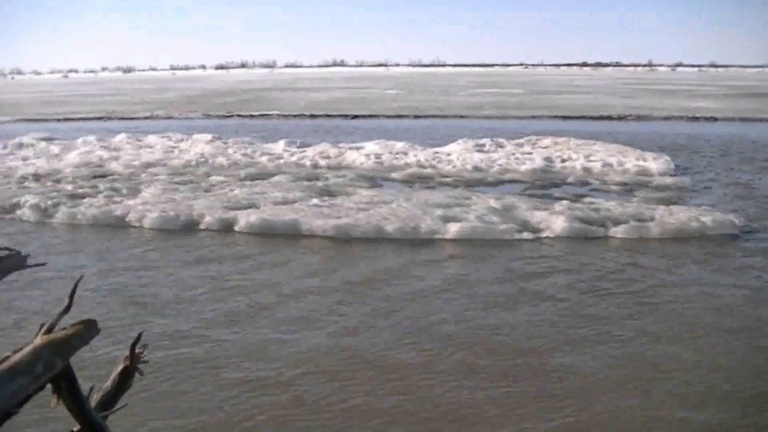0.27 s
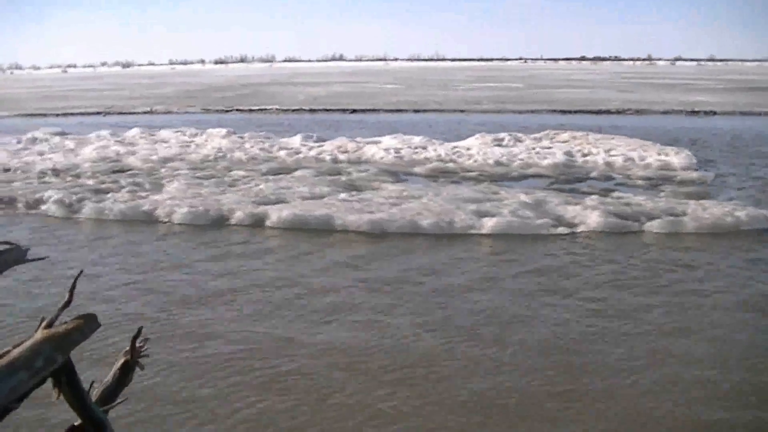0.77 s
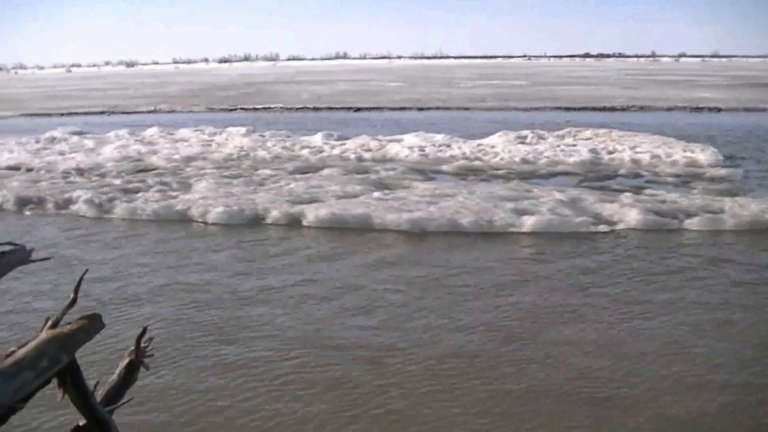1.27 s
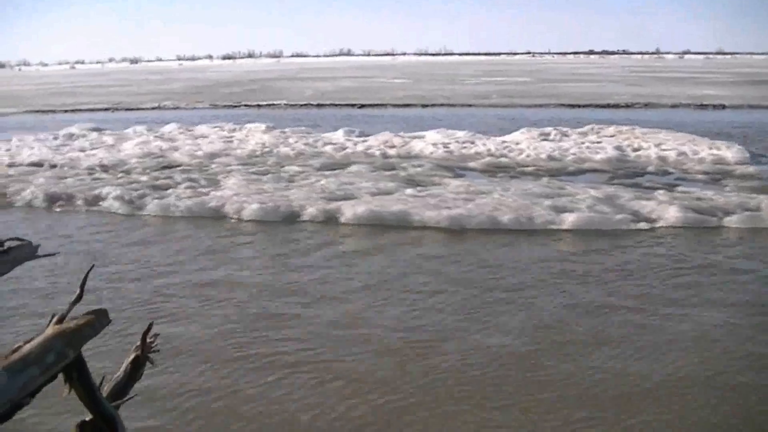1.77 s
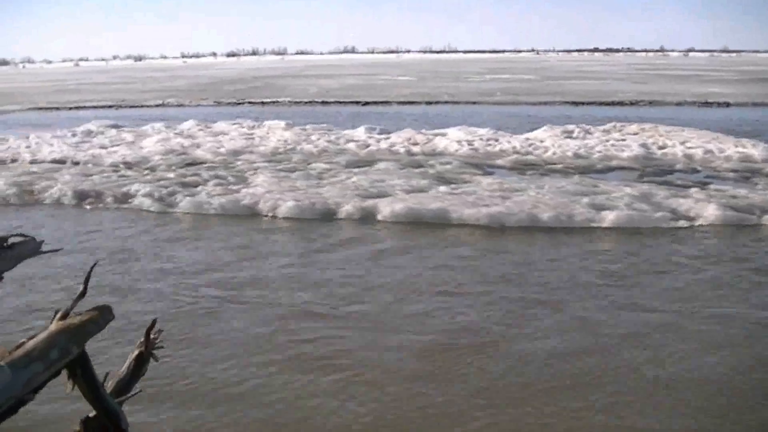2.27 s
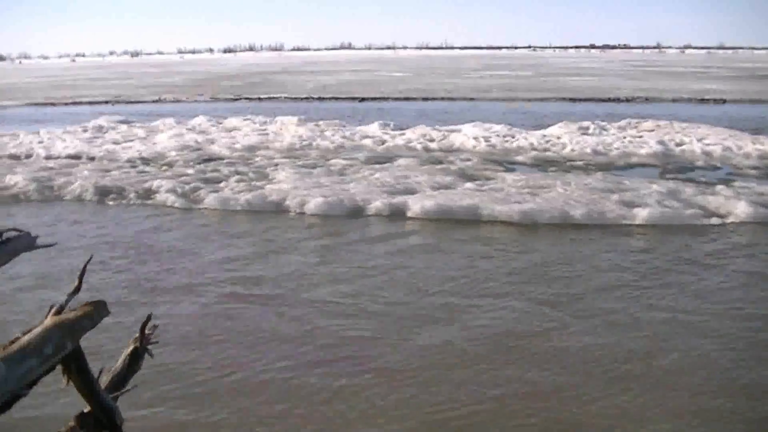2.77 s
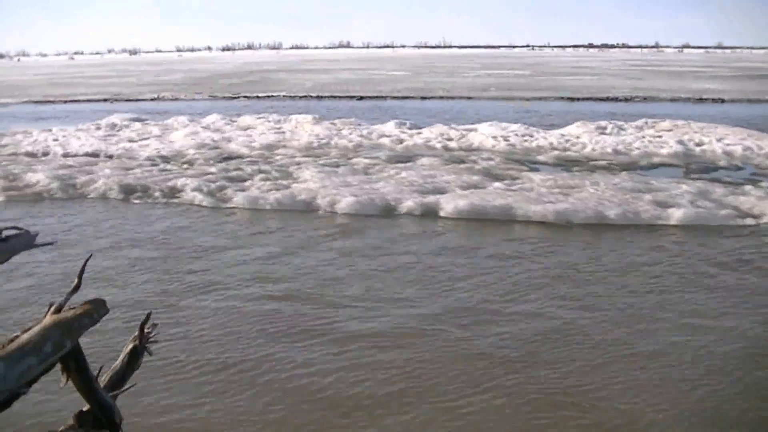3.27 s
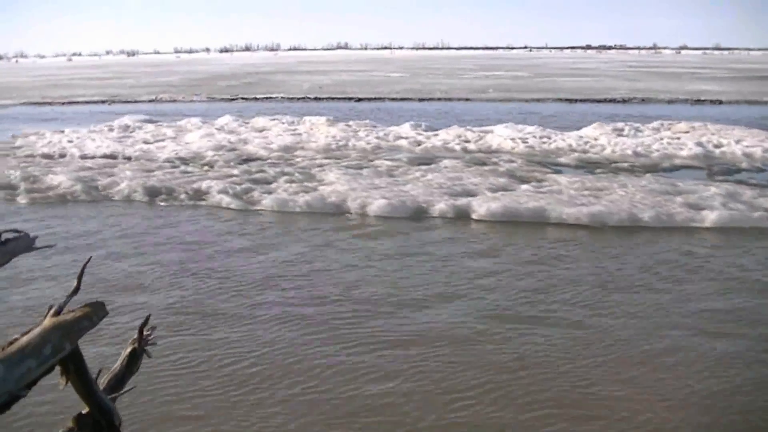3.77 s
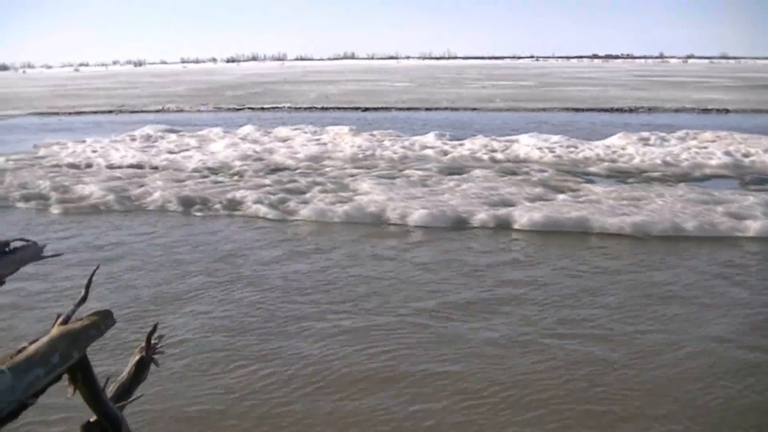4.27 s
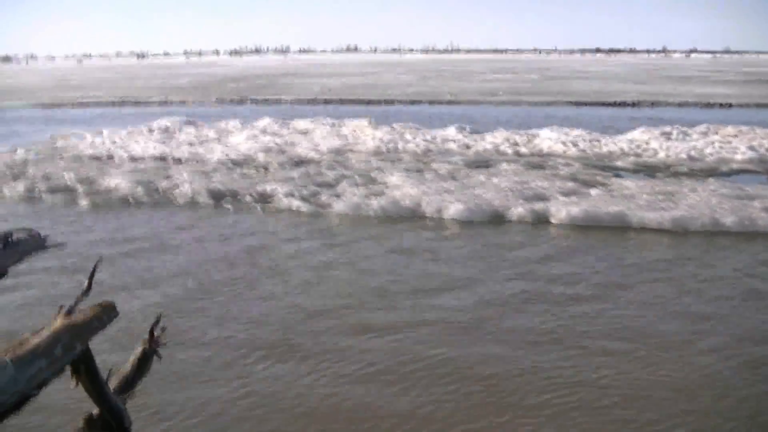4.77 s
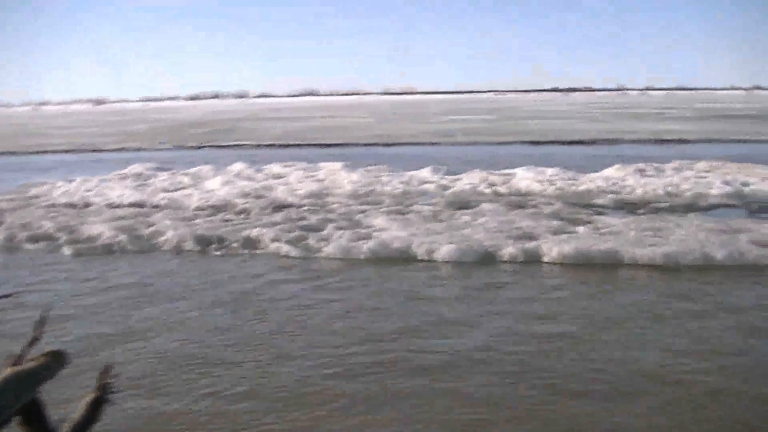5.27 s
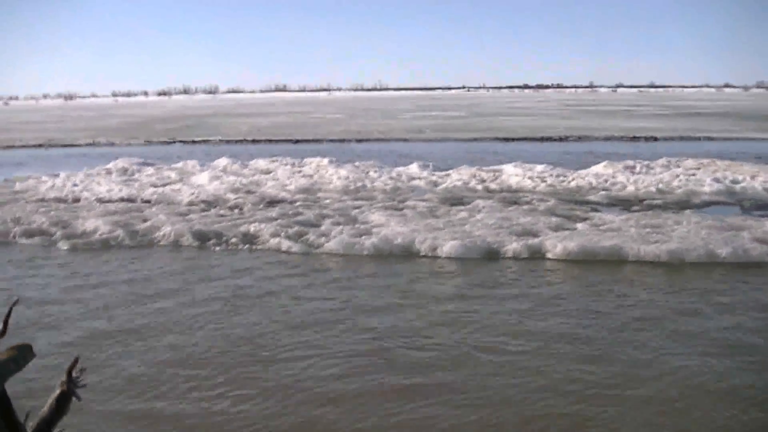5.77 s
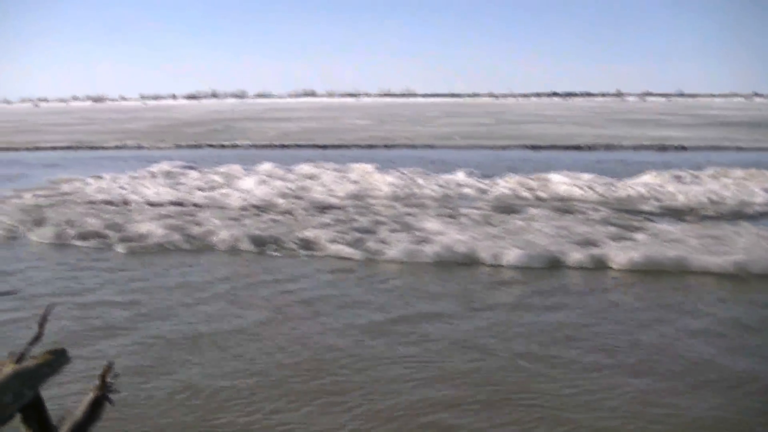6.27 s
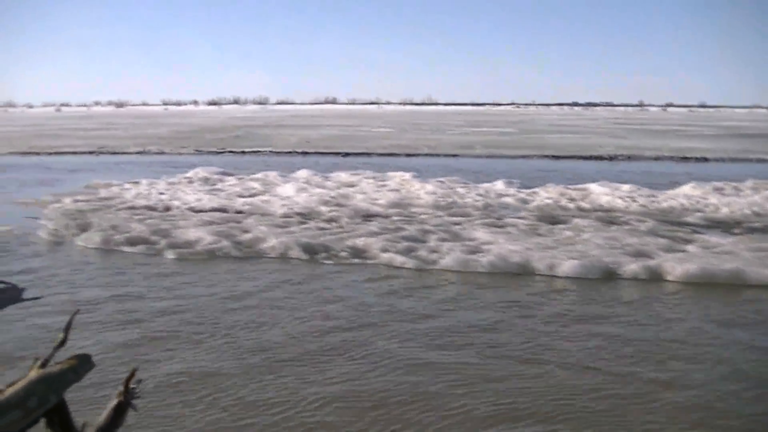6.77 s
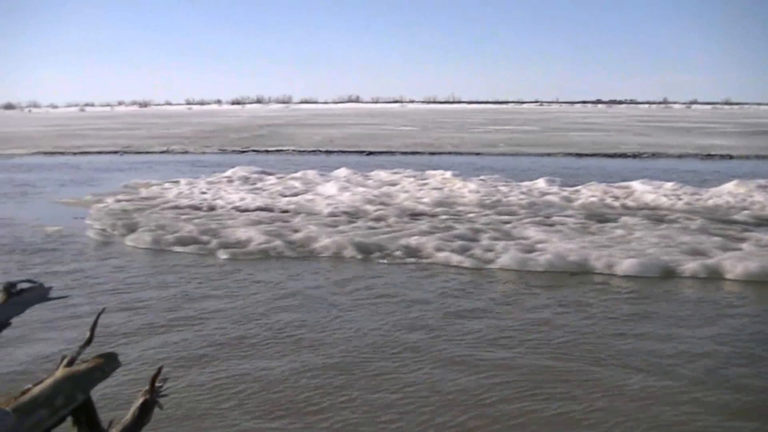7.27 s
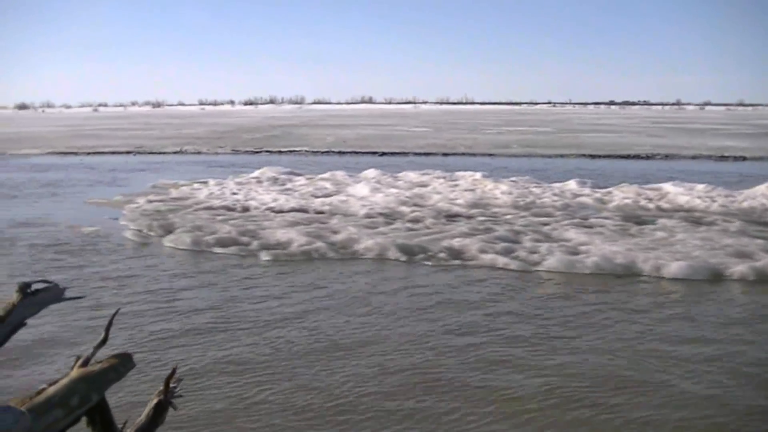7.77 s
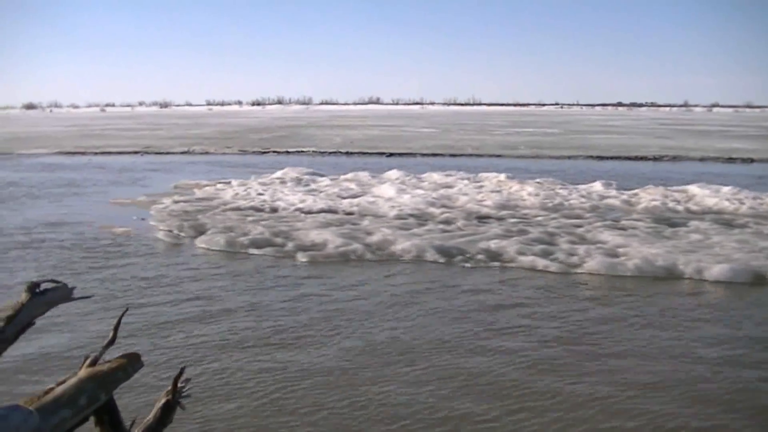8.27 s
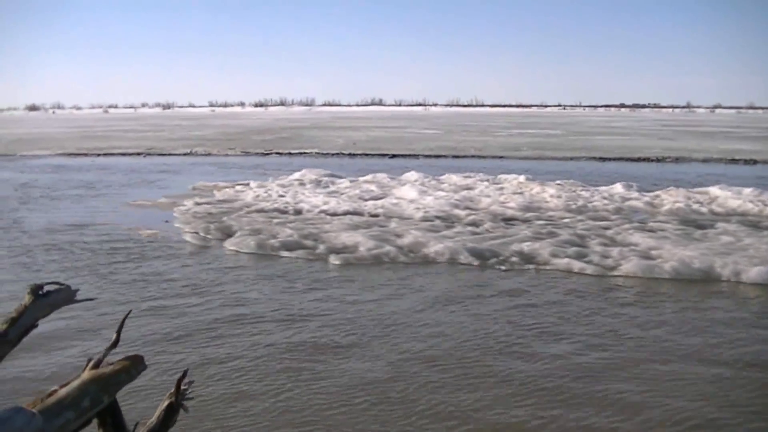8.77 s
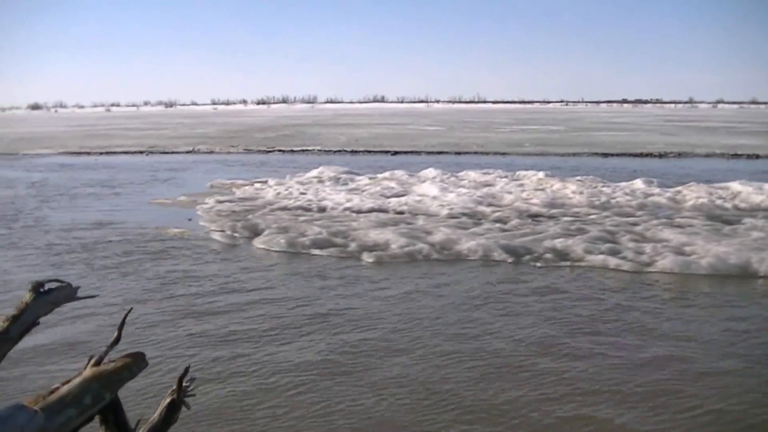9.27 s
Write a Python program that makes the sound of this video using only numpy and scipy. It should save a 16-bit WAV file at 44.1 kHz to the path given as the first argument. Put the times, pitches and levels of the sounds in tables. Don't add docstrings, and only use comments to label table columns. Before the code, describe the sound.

Slushy ice drifts along a river, crackling and ticking irregularly with small wet plops and gurgles, while wind buffets the right side.

```python
import sys
import numpy as np
from scipy import signal
from scipy.fft import rfft, irfft
from scipy.io import wavfile
from scipy.ndimage import uniform_filter1d

SR = 44100
rng = np.random.default_rng(int(sys.argv[2]) if len(sys.argv) > 2 else 0)


def to_linear_factor(level_db):
    exponent = np.asarray(level_db, float) / 20
    return 10 ** exponent


def generate_wav(sig):
    pcm = np.round(np.clip(np.atleast_2d(sig).T, -1, 1) * 32767).astype(np.int16)
    wavfile.write(sys.argv[1], SR, pcm)


N = 420273

# (time [s], peak [dB], pitch [Hz], ring time T60 [s])
HOLLOWS = [(0.17, -41.5, 750, 0.026), (2.3142, -40, 1220, 0.025), (2.4746, -22.5, 804, 0.03),
           (2.4867, -29.5, 730, 0.011), (2.5623, -32, 950, 0.003), (2.57, -38.5, 870, 0.013),
           (2.864, -38.5, 710, 0.014), (2.882, -36, 750, 0.015), (2.9374, -37.5, 660, 0.058),
           (3.012, -25, 827, 0.0074), (3.046, -33, 1110, 0.015), (3.5796, -29.5, 785, 0.016),
           (4.117, -30, 1020, 0.0015), (4.2347, -28, 696, 0.0018), (4.369, -36.5, 1100, 0.004),
           (5.3924, -37.5, 870, 0.022), (6.2374, -33.5, 956, 0.015), (7.7331, -34, 900, 0.014),
           (7.7506, -28, 813, 0.0095), (7.771, -30, 897, 0.032), (7.7751, -29, 780, 0.01),
           (8.2773, -32, 950, 0.027), (8.5687, -38.5, 783, 0.013), (9.416, -38.5, 780, 0.0089)]
# (time [s], peak [dB], pitch [Hz], ring time T60 [s])
POCKETS = [(0.1688, -38, 1860, 0.0071), (0.2108, -30, 1940, 0.0033), (0.4665, -29.5, 1693, 0.022),
           (0.636, -33, 1660, 0.0044), (1.9726, -35, 1850, 0.0076), (2.047, -39, 1800, 0.008),
           (2.124, -36, 1430, 0.027), (2.347, -32.5, 1750, 0.0025), (2.488, -31.5, 1500, 0.013),
           (2.9905, -31, 1700, 0.02), (3.013, -23, 1470, 0.0091), (3.576, -34.5, 1460, 0.0071),
           (4.102, -27.5, 2680, 0.0042), (4.159, -35, 1560, 0.0067), (4.2124, -34.5, 1840, 0.014),
           (4.616, -32.5, 1480, 0.031), (4.6248, -29.5, 2007, 0.012), (4.7078, -35, 1360, 0.0061),
           (5.1446, -28, 1880, 0.002), (5.2043, -29, 1680, 0.017), (6.021, -36, 1800, 0.012),
           (6.2352, -30.5, 1460, 0.011), (7.0225, -35.5, 1470, 0.0067), (7.1447, -36, 1670, 0.0056),
           (7.2977, -33.5, 2130, 0.024), (7.305, -35, 2240, 0.012), (7.5965, -32.5, 1540, 0.013),
           (7.7437, -34.5, 2280, 0.022), (7.773, -39, 2250, 0.015), (8.283, -29, 1487, 0.027),
           (8.339, -33.5, 1930, 0.021), (9.02, -48.5, 1680, 0.042), (9.09, -48, 2760, 0.051)]
# (time [s], peak [dB], pitch [Hz])
GULPS = [(0.0457, -42, 1050), (1.5966, -39, 720), (1.8041, -44, 626), (2.0308, -42.5, 673),
         (2.0572, -40, 640), (2.3333, -35.5, 810), (2.4862, -30.5, 960), (2.8022, -41.5, 780),
         (4.2886, -39.5, 830), (3.482, -42.5, 775), (5.0028, -38, 1130), (5.3393, -43, 654),
         (6.2515, -40, 635), (6.2774, -41.5, 714), (6.7055, -41.5, 660), (7.218, -46.5, 870),
         (7.275, -44.5, 720), (8.4088, -40, 730)]
# (time
# [s], peak [dB], resonance [Hz])
ICE_TICKS = [(.089, -33, 1740), (0.1767, -30.5, 1650), (1.083, -29.5, 1690), (1.3912, -23, 1550),
             (2.1382, -29, 1760), (2.435, -24, 1090), (2.475, -24.5, 1050), (2.5248, -31, 1560),
             (2.864, -28, 1310), (3.3505, -30.5, 1500), (3.3686, -33, 1170), (3.6811, -34, 1720),
             (4.419, -30.5, 1490), (5.29, -33.5, 1410), (5.297, -33.5, 1670), (5.688, -32, 1660),
             (5.744, -28.5, 1440), (5.798, -29, 1690), (6.0072, -32.5, 1450), (6.3664, -36.5, 1630),
             (8.2772, -21.5, 1770), (8.8809, -34, 1090), (8.911, -25, 1620), (9.0798, -37, 1530),
             (0.115, -31.5, 1740), (0.344, -31, 2950), (1.4941, -34, 1750), (1.727, -36, 1720),
         (1.853, -29.5, 1940), (1.9907, -34, 1870), (2.1695, -33.5, 3050), (3.0388, -22, 2290),
         (3.123, -26.5, 2230), (3.3607, -27.5, 1940), (3.551, -27, 2950), (3.599, -30.5, 2150),
         (4.368, -36, 1980), (4.625, -26, 1780), (5.1635, -28.5, 2340), (5.253, -29, 2500),
         (5.268, -32, 2610), (5.394, -38, 2400), (5.734, -40, 1780), (5.9381, -32.5, 2080),
         (6.6607, -38, 2100), (7.3389, -32, 2150), (7.975, -29, 1900), (8.2072, -34, 1930),
         (8.444, -33, 1930), (8.866, -32.5, 1230), (8.992, -36, 2260), (9.064, -37.5, 2330),
             (0.0767, -37, 2780), (0.199, -42, 1760), (0.2522, -38.5, 1760), (0.5293, -35, 1720),
             (0.758, -36.5, 1790), (0.7672, -38, 1680), (1.209, -38.5, 1640), (1.7945, -37, 1390),
             (1.891, -37.5, 1840), (1.9257, -36, 1540), (2.536, -38, 1580), (2.5727, -38, 1720),
             (2.6338, -38, 3200), (2.939, -35.5, 1410), (2.983, -33, 2030), (3.0587, -26.5, 3120),
             (3.4885, -35, 2540), (3.7032, -39, 1920), (4.0744, -33.5, 2120), (4.092, -31, 2050),
             (4.121, -36, 1860), (4.137, -33.0, 1560), (4.349, -39, 1550), (4.4436, -38, 1820),
             (4.5593, -34, 1530), (4.7687, -38, 1700), (4.8853, -38.5, 2080), (4.9534, -37, 1800),
             (4.985, -38.5, 2790), (5.003, -37.5, 1500), (5.218, -37, 2210), (5.2835, -32, 2530),
             (5.7527, -37, 1650), (6.0943, -36, 1650), (6.197, -35.5, 1500), (6.276, -44, 2660),
             (6.295, -41, 2070), (6.321, -39, 2500), (6.762, -35, 2410), (6.776, -35.5, 2070),
             (7.3208, -43, 2000), (7.353, -38, 1980), (7.8264, -37, 2180), (7.834, -35, 2080),
             (8.064, -35.5, 1590), (8.1023, -37, 1960), (8.1796, -37.5, 1480), (8.24, -33.5, 2150),
             (8.3237, -32, 2140), (8.6158, -38, 1900), (8.7982, -37, 2040),
             (0.363, -34.5, 6550), (0.632, -38, 6450), (0.8311, -30, 4930), (1.0568, -37.5, 4500),
           (1.061, -37, 7200), (2.27, -35.5, 4700), (2.4037, -31, 5950), (2.4492, -27, 4700),
           (3.098, -32, 5500), (3.597, -30.5, 4830), (3.681, -35.5, 4850), (4.189, -33, 4000),
           (5.265, -36, 4550), (5.659, -42, 4470), (5.733, -36, 4540), (5.974, -32.5, 4570),
           (6.035, -33.5, 4560), (6.276, -40, 4830), (6.948, -36.5, 4940), (7.016, -39, 8500),
           (7.9677, -36.5, 6150), (8.834, -39.5, 5400), (9.155, -34, 5030),
             (2.4225, -33, 1740), (2.444, -36, 2840), (2.452, -41, 1890), (2.808, -36, 1490),
          (2.9923, -33, 2960), (4.2322, -36, 4500), (4.4442, -38, 2850), (5.5171, -39, 1270),
          (5.8192, -35, 1610), (6.2656, -43, 3020), (7.2975, -35, 2980)]
# (time [s], peak [dB])
SHARDS = [(0.0896, -34), (0.2088, -35), (0.344, -27), (0.466, -33.5), (2.18, -38), (2.426, -32),
          (2.865, -30.5), (3.012, -29.5), (3.046, -27), (3.073, -32), (3.549, -36), (3.587, -36),
          (3.615, -31.5), (3.7978, -38), (4.254, -32), (4.098, -32), (4.795, -39), (5.1632, -38),
          (5.284, -34), (6.0215, -33), (6.3212, -39), (7.063, -39.5), (7.242, -38.5), (9.1414, -39.5),]
# (time [s], peak [dB])
GRIT = [(1.845, -39.5), (2.3265, -40), (3.061, -38), (3.0805, -43), (3.4407, -41), (4.2405, -44),
        (4.247, -38), (4.884, -39), (5.276, -34), (5.387, -38.5), (5.986, -46), (6.212, -40),
        (8.0153, -40.5), (8.5034, -41.5)]
# (time [s], peak [dB])
SPARKS = [(0.115, -41), (0.3435, -35.5), (0.4635, -37), (0.5084, -39.5), (0.627, -36.5), (1.052, -38.5),
          (1.909, -41.5), (1.978, -47), (2.059, -40), (2.1979, -47), (2.36, -41), (2.5129, -39.5),
          (2.8905, -45), (3.0195, -39.0), (3.316, -41), (3.338, -44.5), (3.384, -45), (3.4658, -53),
          (3.5625, -45), (3.579, -39.5), (3.605, -36.5), (3.703, -41), (3.7705, -41.5), (3.8362, -48),
          (3.853, -39.5), (3.9676, -47), (4.0414, -37), (4.121, -37), (4.1585, -48), (4.172, -36),
          (4.796, -50), (5.258, -45.5), (5.2755, -51), (5.3509, -42.5), (5.496, -43), (5.6877, -61.5),
          (5.696, -37.5), (5.8015, -41.5), (5.9395, -38), (6.3472, -46), (6.41, -43.5), (6.5135, -48.5),
          (6.668, -43), (6.861, -44), (7.0315, -40), (7.716, -42.5), (7.738, -41), (7.764, -50),
          (7.93, -49), (8.6045, -43), (8.7435, -41)]
# (crest time [s], length [s], gurgle level [dB], crackle level [dB])
WAVELETS = [(.14, 0.44, -55, -53), (.4, 0.22, -48.5, -53.5), (1.3, 8.8, -56.5, -62), (2.1, 1.4, -50, -58),
            (2.44, 0.23, -40, -43.5), (3.04, 0.53, -45.5, -48.5), (3.56, 0.65, -48.5, -52),
            (4.14, 0.56, -45.5, -49.5), (4.5, 4, -50, -56), (4.95, 0.66, -48, -55.5),
            (5.27, 0.76, -47, -53), (5.72, 0.16, -46, -42), (6.01, 1.1, -55.5, -54), (6.3, 0.24, -52, -46),
            (6.84, 1.2, -57, -53), (7.32, 0.38, -50.5, -49.5), (7.77, 0.69, -50, -54),
            (8.33, 3.7, -52.5, -65), (8.85, 0.71, -52.5, -72)]
# (time [s], peak [dB], centre frequency [Hz])
EDDIES = [(1.695, -24.5, 413), (1.6081, -27, 393), (1.6137, -31, 350), (1.64, -26, 670), (1.65, -29, 620),
          (1.683, -36, 400), (1.7969, -19.5, 535), (1.912, -29, 395), (1.9524, -22.5, 397),
          (2.314, -26.5, 470), (2.342, -34.5, 322), (2.463, -19.5, 530), (2.4806, -28, 415),
          (2.598, -32, 510), (3.7592, -31.5, 650), (4.2351, -12.5, 705), (4.246, -25, 407),
          (4.509, -31.5, 275), (4.567, -29, 490), (4.581, -30, 450), (4.632, -25.5, 500),
          (4.5726, -23.5, 597), (4.971, -30.5, 342), (6.196, -27.5, 695), (6.818, -30.5, 645),
          (6.074, -38.5, 377), (6.924, -36, 440), (9.24, -40.5, 340), (8.119, -32.5, 340),
          (1.5608, -32, 352), (1.7048, -31, 380), (1.736, -26.5, 352), (1.7803, -30.5, 510),
          (1.8066, -20, 472), (1.8372, -27.5, 450), (1.8857, -33.5, 393), (1.901, -30, 413),
          (1.938, -24.5, 630), (2.43, -35, 400), (2.4954, -29, 486), (2.556, -32, 437), (3.4301, -36, 466),
          (3.748, -32.5, 420), (4.0361, -34.5, 385), (4.1243, -35.5, 340), (4.2022, -31.5, 660),
          (4.5558, -21.5, 570), (4.6264, -23, 544), (4.7222, -37.5, 384), (6.1185, -36.5, 372),
          (6.6983, -33.5, 313), (6.8002, -38, 320), (8.2609, -42, 384), (9.4733, -35, 355)]
# (peak time [s], length [s], level [dB])
PUFFS = [(1.62, 0.51, -49.5), (1.74, 0.047, -45.5), (1.81, 0.15, -45), (1.96, 0.42, -58), (2.31, 0.27, -55),
         (2.46, 0.069, -52), (2.6, 0.98, -60.5), (3.43, 0.25, -60), (3.75, 0.089, -57), (3.89, 0.15, -58.5),
         (4.1, 1, -63.5), (4.24, 0.12, -47), (4.32, 0.043, -49), (4.59, 0.41, -45.5), (4.97, 0.27, -53),
         (6.09, 0.14, -62), (6.19, 0.097, -53.5), (6.6, 0.64, -62.5), (6.7, 0.29, -65),
         (6.82, 0.082, -48.5), (6.92, 0.033, -49), (7.49, 0.56, -63.5), (8.26, 0.087, -55),
         (8.45, 0.77, -67), (9.52, 0.31, -55.5)]
# (frequency [Hz], density [dB per Hz])
BREEZE_SPECTRUM = [(24, -64), (40, -9), (100, -12.5), (330, -1), (560, -8.5), (1800, -23), (2340, -48),
                   (3960, -120)]
# (time [s], length [s], top pitch [Hz], first partial [dB], second partial [dB])
HONKS = [
    (3.762, 0.069, 794, -60, -51),
    (4.371, 0.079, 810, -53, -44),
    (4.651, 0.084, 825, -57, -47.5),
    (6.813, 0.057, 780, -76, -49),
]
# (time [s], length [s], pitch [Hz], level [dB])
PIPES = [
    (6.418, 0.087, 953, -58),
    (8.917, 0.1, 960, -55.5),
]
# (time [s], level [dB])
MOTOR_LEVEL = [
    (2.5, -89),
    (3.8, -66.5),
    (6.5, -66),
    (7.5, -65),
    (8.3, -99),
]
# (frequency [Hz], density [dB per Hz])
WASH_SPECTRUM = [(150, -55), (250, -9), (686, 1), (1630, -1.5), (4330, -7.5), (8480, -18), (11500, -23.5),
                 (15000, -100)]
# (frequency [Hz], correlation [0-1])
WASH_CORRELATION = [(300, 1), (600, 0.45), (1450, 0.75), (3000, 0.35), (5000, 1), (10000, 0.98)]


def ice_edge():
    mid, side = np.zeros((2, N))
    gulp_cycles = 12.3
    shard_hz, grit_hz = 4060, 4700
    plops = HOLLOWS + POCKETS + [(s, db, hz, gulp_cycles / hz) for s, db, hz in GULPS]
    ticks = ICE_TICKS
    ticks = ticks + [(s, db, shard_hz) for s, db in SHARDS]
    ticks = ticks + [(s, db, grit_hz) for s, db in GRIT]

    for (s, db, hz, t60_s), noise in zip(plops, rng.standard_normal((len(plops), 900))):
        ring = to_linear_factor(db + 2.0) * bubble(hz, 1.1 * t60_s, glide=0.11 * noise[0], rise_s=0.0015)
        slap = snap(0.83 * hz, noise, t60_s=0.026, width=2.9, tail_db=-15.0, tail_t60_s=0.069)
        add(mid, s - .0005, ring)
        add(side, s - .0004, (0.076 + 0.097 * noise[1]) * ring)
        add(mid, s, to_linear_factor(db - 3.5) * slap)

    for (s, db, hz), noise in zip(ticks, rng.standard_normal((len(ticks), 900))):
        t60_s = 0.012 + 12 / hz
        width = (0.25 + 480 / hz) * to_linear_factor(2.8 * noise[1])
        crack = to_linear_factor(db) * snap(hz, noise, t60_s, width)
        add(mid, s - .0007, crack)
        add(side, s - .0006, (0.073 + 0.08 * noise[0]) * crack)
    return mid + to_linear_factor(-19.5) * bank(mid) + np.array([-side, side])


def bubble(hz, t60_s, glide=0.03, rise_s=0.00017):
    t = np.arange(round(t60_s * SR) + 40) / SR
    turns = hz * (t + glide * t ** 2 / t60_s)
    wave = np.sin(2 * np.pi * turns) * to_linear_factor(-60 * t / t60_s) * (1 - np.exp(-t / rise_s))
    return wave / abs(wave).max()


def snap(hz, noise, t60_s, width, rise_s=0.00053, tail_db=-14, tail_t60_s=0.063):
    t = np.arange(len(noise)) / SR
    decay = to_linear_factor(-60 * t / t60_s) + to_linear_factor(tail_db - 60 * t / tail_t60_s)
    burst = noise ** 3 * (1 - np.exp(-t / rise_s)) * decay
    burst[24] = 30
    b, a = signal.iirpeak(min(hz, 11000), 1 / width, SR)
    edge = signal.lfilter(b, a, burst)
    bare_crack = 0.21 * abs(noise[2]) * edge
    wave = signal.lfilter(b, a, edge) + bare_crack
    return wave / abs(wave).max()


def bank(x):
    taps = np.zeros((2, 1800))
    at = rng.integers(60, 1800, (2, 40))
    at[1, :28] = at[0, :28]
    gains = to_linear_factor(-60 * at / SR / 0.5) * rng.choice([-1., 1.], 40)
    np.put_along_axis(taps, at, gains, 1)
    return signal.oaconvolve(x[None], taps / np.linalg.norm(taps[0]), axes=1)[:, :N]


def sparks():
    out, t = np.zeros(N), np.arange(400) / SR
    for (s, db), noise in zip(SPARKS, rng.standard_normal((len(SPARKS), 400))):
        burst = 0.3 * noise ** 3 * to_linear_factor(-60 * t / 0.01215)
        burst[8] = 0.97
        add(out, s, to_linear_factor(db + 1.5) * burst)
    out = signal.sosfilt(signal.butter(2, [3200, 9500], "band", fs=SR, output="sos"), out)
    return out * (1 + np.array([[-.08], [.08]]))


def slush():
    pitches_hz = np.geomspace(580, 3100, 14)
    bubbles = [bubble(hz, rng.uniform(3.7, 21.3) / hz, rise_s=0.0029) for hz in pitches_hz]
    gurgle = scatter(bubbles, per_s=170, spread_db=4.0, bunch_db=3.5, lean=0.12)

    snaps = []
    for hz in np.geomspace(1100, 9000, 12):
        grain = snap(hz, rng.standard_normal(500), t60_s=0.044, width=.5)
        snaps.append(to_linear_factor(-2.5 * np.log2(hz / 2600)) * grain)
    crackle = scatter(snaps, per_s=150, spread_db=3.5, bunch_db=6.5, lean=0.057)

    gurgle = gurgle * swells(WAVELETS, axis=2, rise=0.6, depth_db=18, calm_db=-67.5)
    crackle = crackle * swells(WAVELETS, axis=3, rise=0.6, depth_db=18, calm_db=-71)
    return to_linear_factor(-3.0) * gurgle + to_linear_factor(1.5) * crackle


def scatter(shapes, per_s, spread_db, bunch_db, lean):
    bunch = to_linear_factor(bunch_db * np.tanh(evened(uniform_filter1d(rng.standard_normal(N), 900))))
    size = bunch * to_linear_factor(spread_db * np.minimum(rng.exponential(1, N), 1.6))
    size = size * (rng.random(N) < per_s / SR)
    which = rng.integers(0, len(shapes), N)
    side = lean * rng.standard_normal(N)
    trains = size * (1 + np.array([side, -side]))
    out = np.zeros((2, N))
    for k, grain in enumerate(shapes):
        out += signal.oaconvolve(trains * (which == k), grain[None])[:, :N]
    return evened(out)


def swells(rows, axis, rise, depth_db, calm_db):
    t, power = np.arange(0, N + 64, 64) / SR, to_linear_factor(calm_db) ** 2
    for row in rows:
        late = (t - row[0]) / row[1]
        distance = np.maximum(-late / rise, late / (1 - rise))
        power = power + to_linear_factor(row[axis] - depth_db * distance ** 0.74) ** 2
    return np.interp(np.arange(N) / SR, t, np.sqrt(power))


def breeze():
    lumps = to_linear_factor(7.3 * np.tanh(evened(uniform_filter1d(rng.standard_normal((2, N)), 180))))
    rough = evened(coloured(lumps * rng.standard_normal((2, N)), BREEZE_SPECTRUM))
    puffs = swells(PUFFS, axis=2, rise=0.43, depth_db=25, calm_db=-81)
    right = to_linear_factor(14) * puffs * rough[1]
    for s, db, hz in EDDIES:
        cycles = np.arange(-1.1, 1.6, hz / SR)
        roll = np.cos(2 * np.pi * cycles) * np.exp(-1.7 * cycles ** 2)
        core = 0.52 * np.exp(-45 * cycles ** 2)
        add(right, s - .0012, -to_linear_factor(db - 0.9) * (roll + core))
    left = to_linear_factor(-30.5) * right + to_linear_factor(-6.0) * puffs * rough[0]
    return np.array([left, right])


def birds():
    out = np.zeros(N)
    for s, length_s, hz, first_db, second_db in HONKS:
        u = np.arange(0, 1, 1 / (length_s * SR))
        hoarse = 1 + 0.013 * evened(uniform_filter1d(rng.standard_normal(len(u)), 150))
        contour = np.interp(u, [0, .45, .8, 1], [0.83, 0.99, 0.94, 0.91])
        turns = np.cumsum(hz * hoarse * contour) / SR
        voice = to_linear_factor(first_db) * np.sin(2 * np.pi * turns) + to_linear_factor(second_db) * np.sin(4 * np.pi * turns)
        envelope = np.interp(u, [0, .35, .55, .85, 1], [0.05, 0.81, 0.78, 0.92, 0.044])
        add(out, s, np.sqrt(2) * voice * (1 + 25 * (hoarse - 1)) * envelope)
    for s, length_s, hz, db in PIPES:
        t = np.arange(0, length_s, 1 / SR)
        add(out, s, np.sqrt(2) * to_linear_factor(db) * np.sin(2 * np.pi * hz * t) * np.hanning(len(t)))
    return out


def motor():
    frame_hz, frame_s = 29.97, 6.416
    steps = np.diff(np.floor((np.arange(N + 1) / SR - frame_s) * frame_hz))
    steps = steps * rng.uniform(0.13, 1, N)
    shell = snap(2873, rng.standard_normal(900), t60_s=0.022, width=0.064, rise_s=0.00073)
    rattle = signal.oaconvolve(steps, shell)[:N]
    level_db = np.interp(np.arange(N) / SR, *np.transpose(MOTOR_LEVEL))
    return to_linear_factor(level_db + [[-3], [1.5]]) * evened(rattle)


def wash():
    frames, hz = N // 128 + 5, np.fft.rfftfreq(512, 1 / SR)
    a, b, c, d, patches = rng.standard_normal((frames, 257, 5)).T
    patches = evened(uniform_filter1d(uniform_filter1d(patches, 8, 0), 14, 1))
    same = np.clip(read(WASH_CORRELATION, hz), -1, 1)[:, None]
    left = a + 1j * b
    right = same * left + np.sqrt(1 - same ** 2) * (c + 1j * d)
    z = np.array([left, right])
    z *= to_linear_factor(read(WASH_SPECTRUM, hz)[:, None] + 2.75 * patches)
    return to_linear_factor(-58) * evened(signal.istft(z, nperseg=512, noverlap=384)[1][:, :N])


def evened(x):
    return x / np.sqrt(np.mean(x ** 2) + 1e-20)


def read(points, hz):
    f, value = np.transpose(points)
    return np.interp(np.log(hz + 1), np.log(f), value)


def coloured(x, points):
    return irfft(rfft(x) * to_linear_factor(read(points, np.fft.rfftfreq(N, 1 / SR))), N)


def add(mix, s, sound):
    part = mix[round(s * SR):][:len(sound)]
    part += sound[:len(part)]


def scene():
    water = ice_edge() + sparks() + slush() + wash()
    water = signal.sosfilt(signal.butter(4, 400, "high", fs=SR, output="sos"), water)
    return water + birds() + breeze() + motor()


def roll_off(x):
    return signal.sosfilt(signal.butter(12, 12690, fs=SR, output="sos"), x)


def record(dry):
    cut = signal.sosfilt(signal.butter(3, 150, "high", fs=SR, output="sos"), dry)
    cut = signal.sosfilt(signal.butter(10, 11350, "low", fs=SR, output="sos"), cut)
    return roll_off(cut)


dry = scene()
out = record(dry)
generate_wav(out)
```